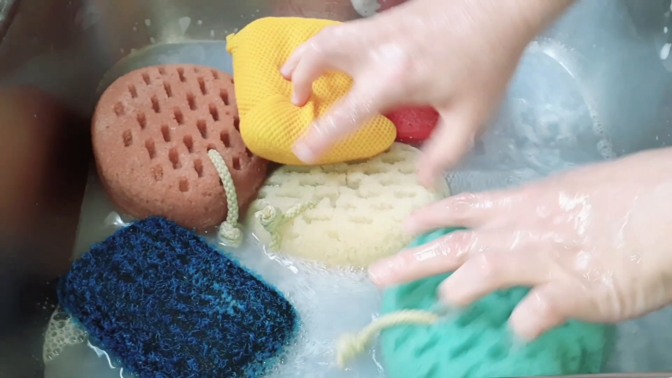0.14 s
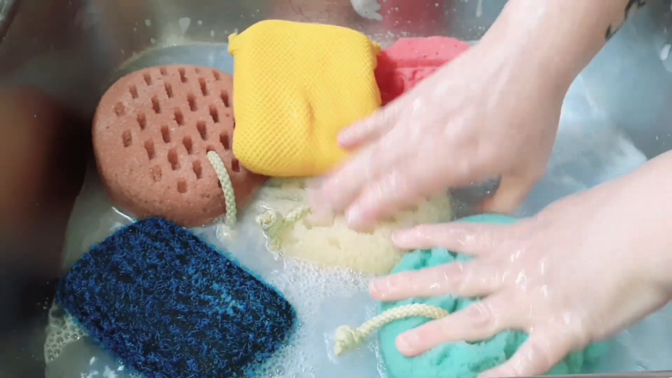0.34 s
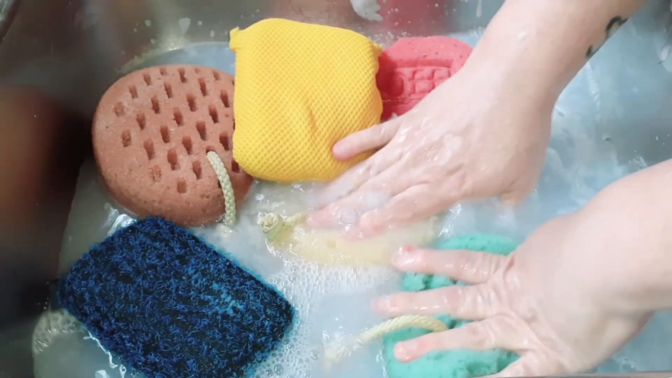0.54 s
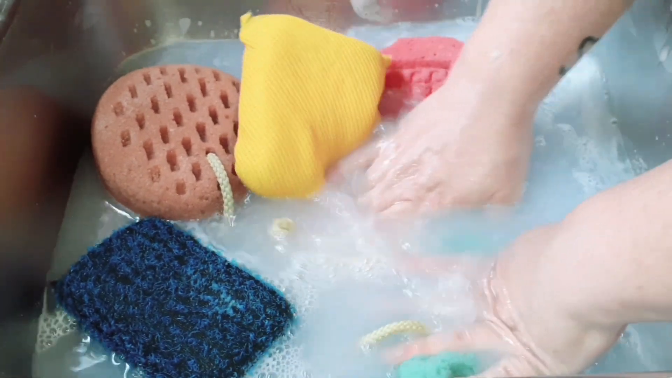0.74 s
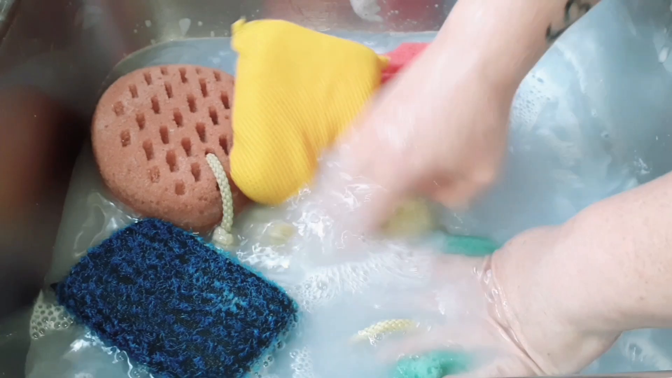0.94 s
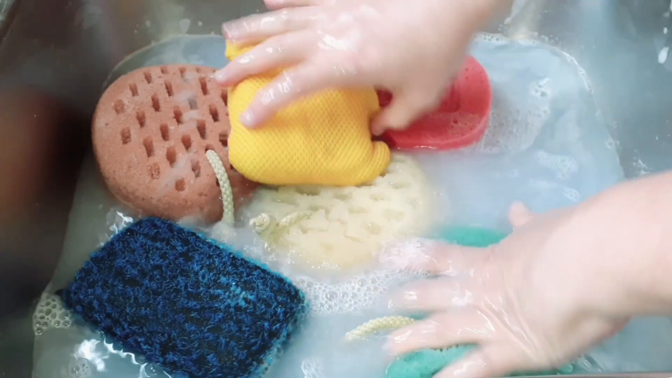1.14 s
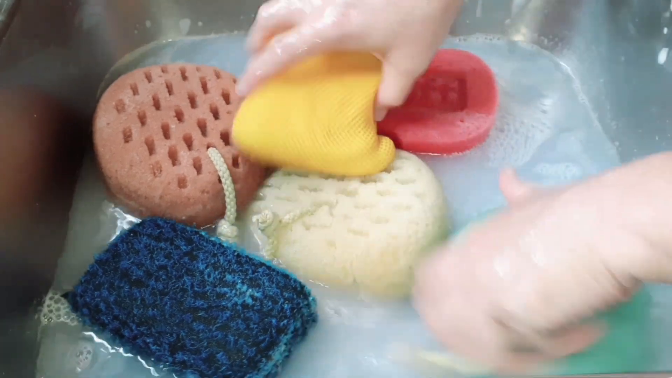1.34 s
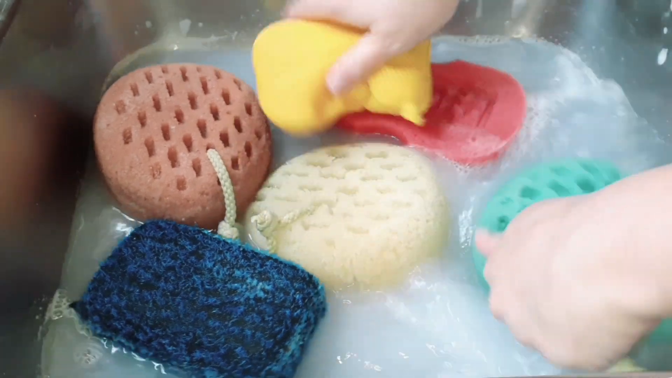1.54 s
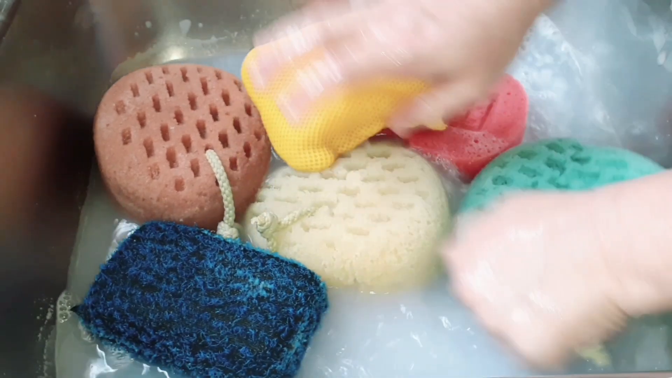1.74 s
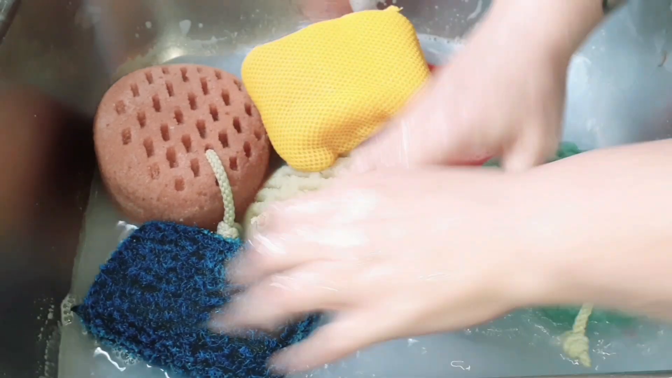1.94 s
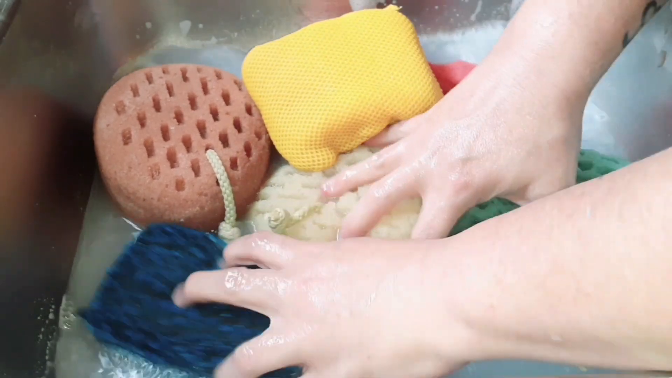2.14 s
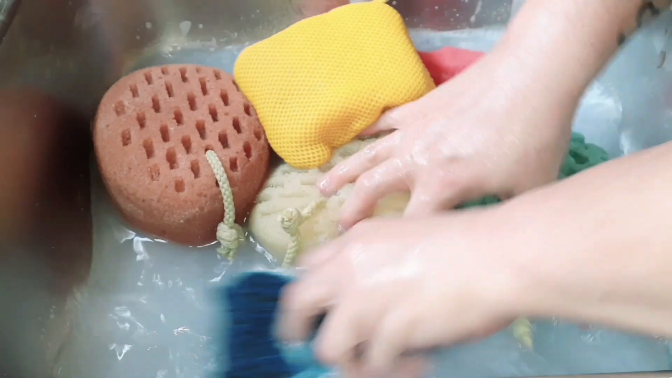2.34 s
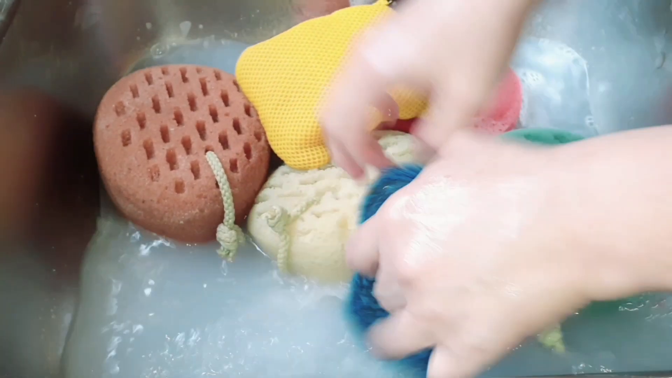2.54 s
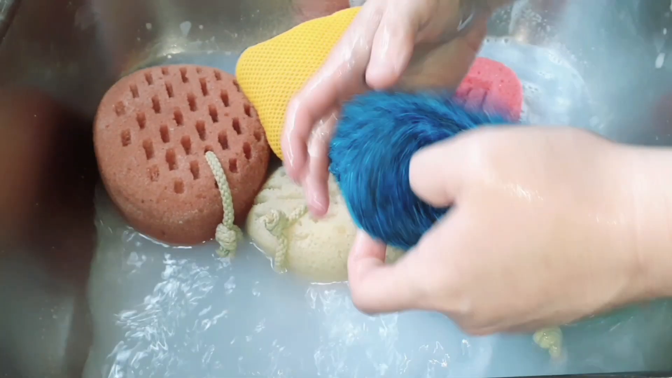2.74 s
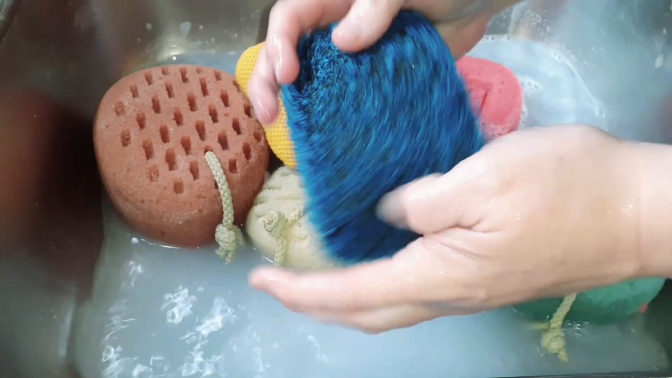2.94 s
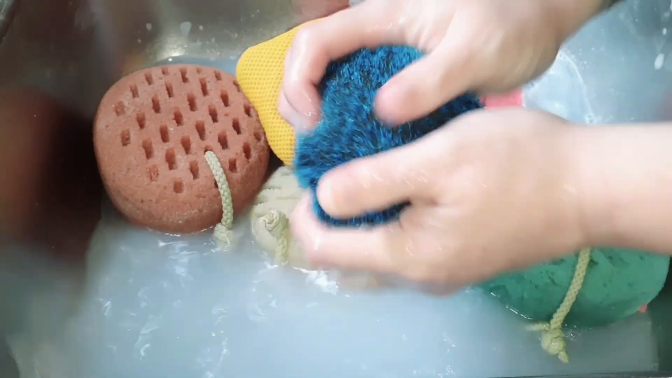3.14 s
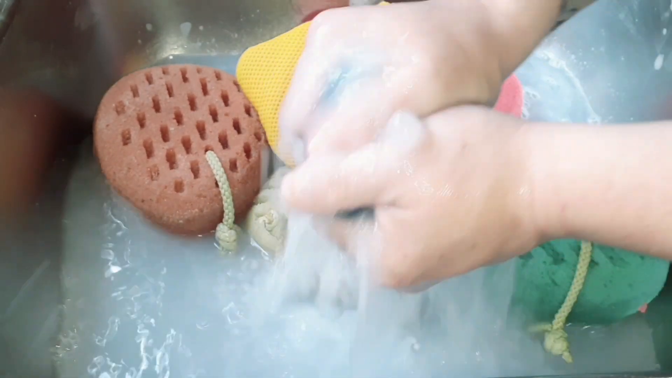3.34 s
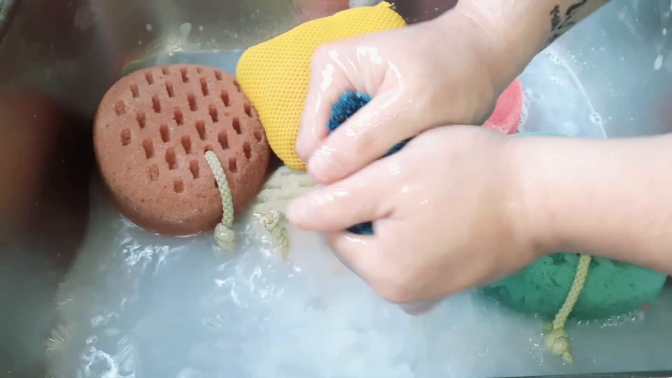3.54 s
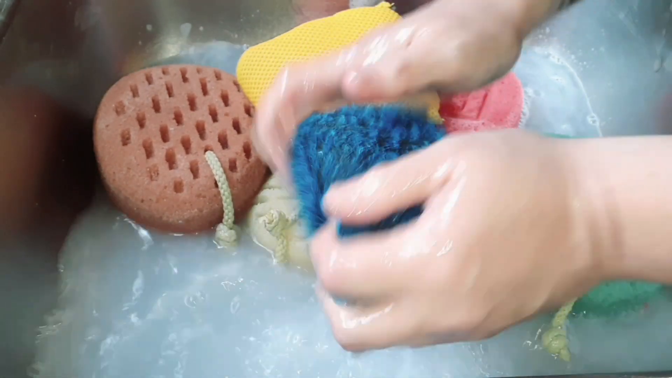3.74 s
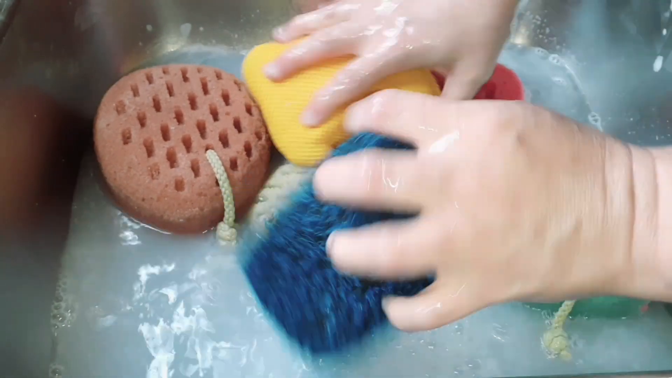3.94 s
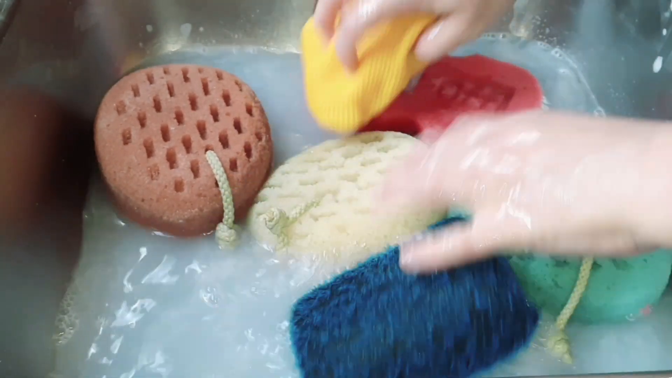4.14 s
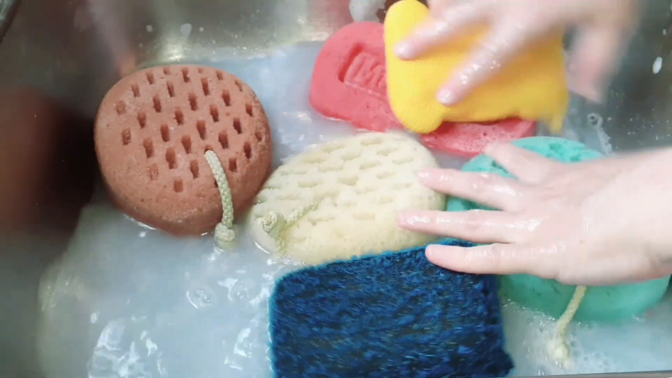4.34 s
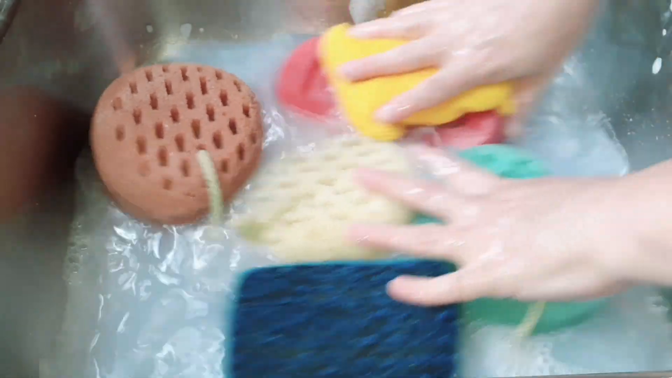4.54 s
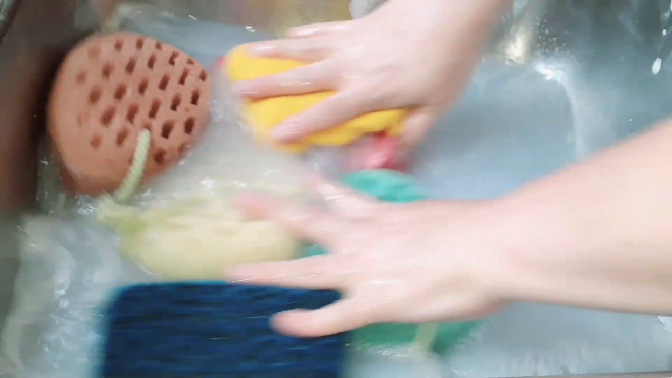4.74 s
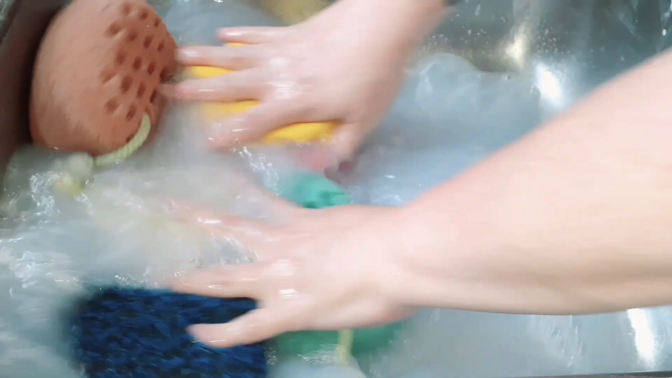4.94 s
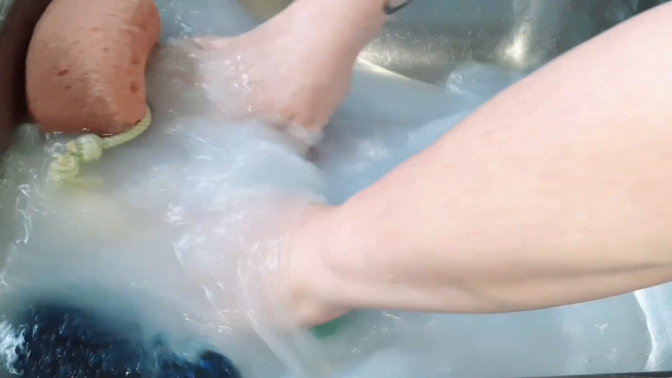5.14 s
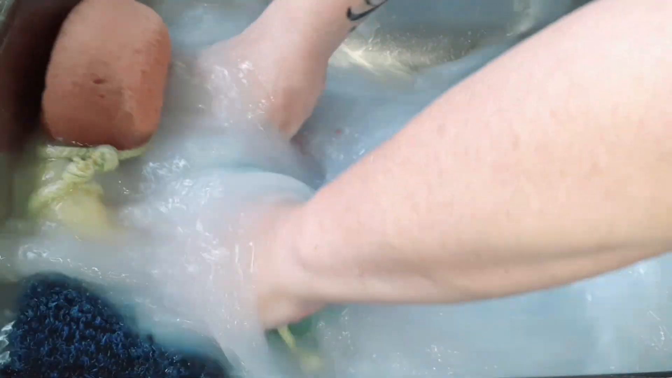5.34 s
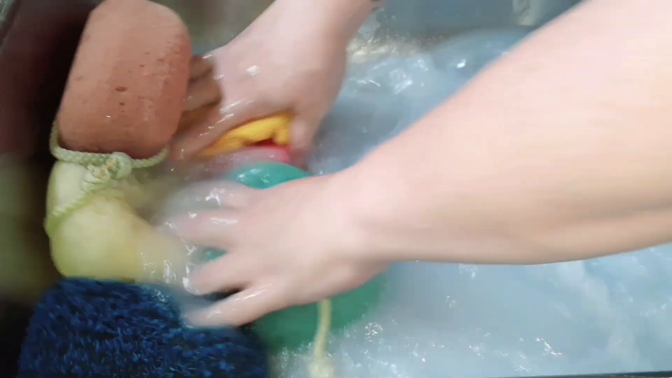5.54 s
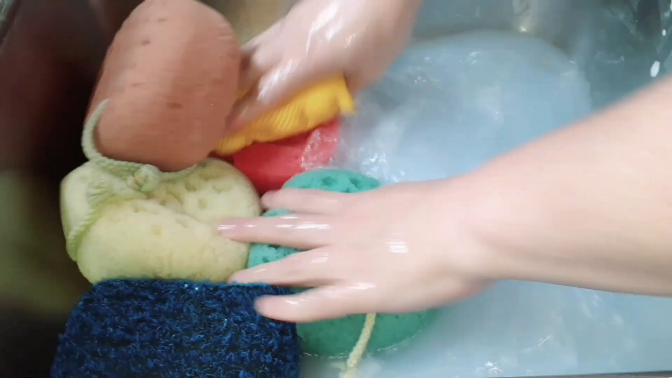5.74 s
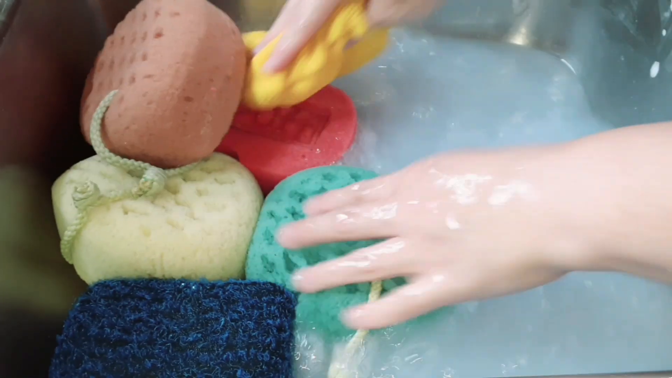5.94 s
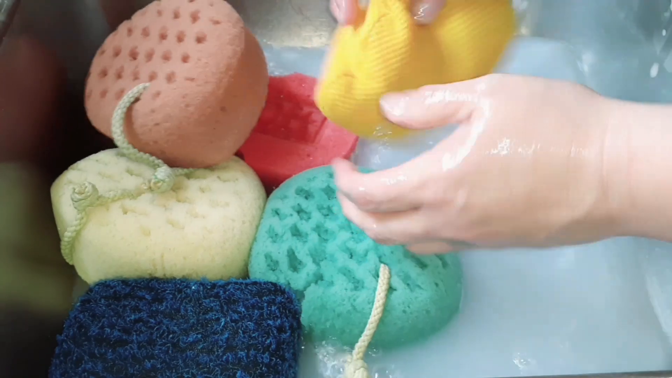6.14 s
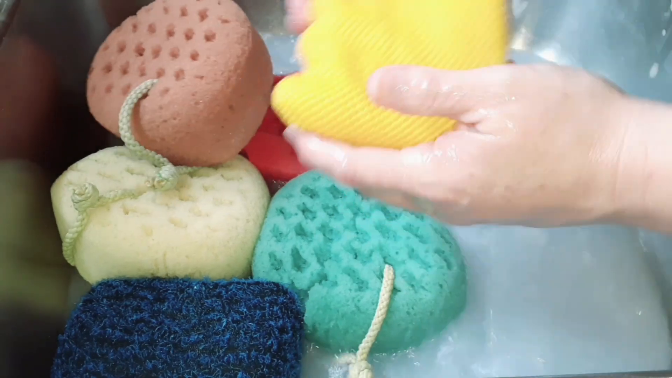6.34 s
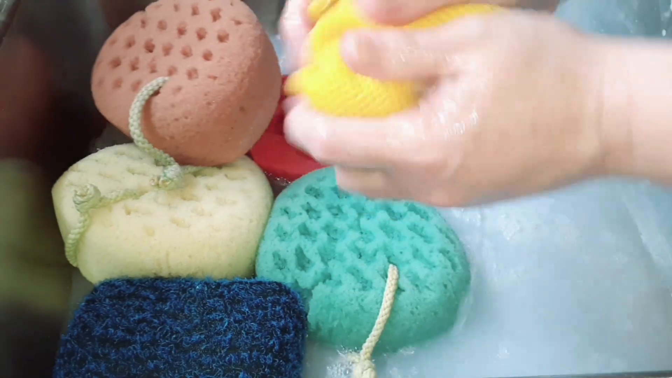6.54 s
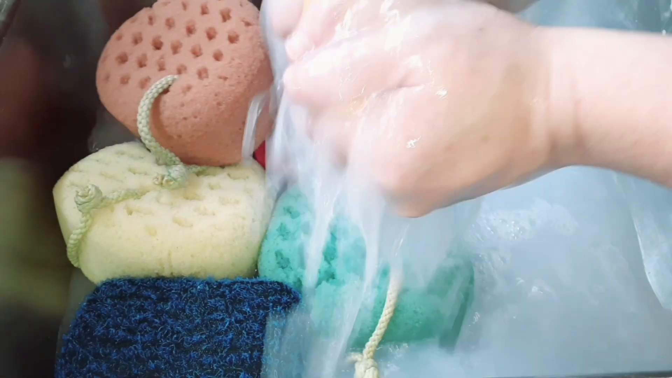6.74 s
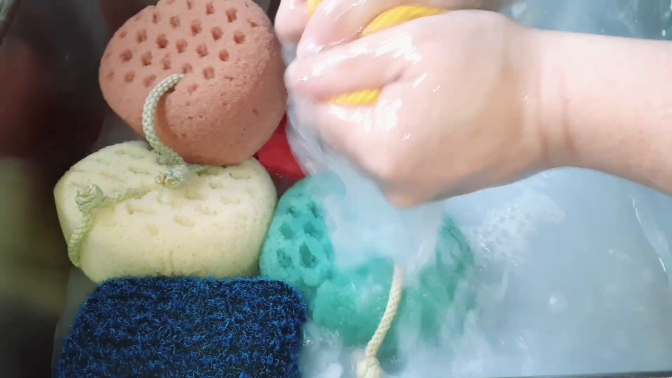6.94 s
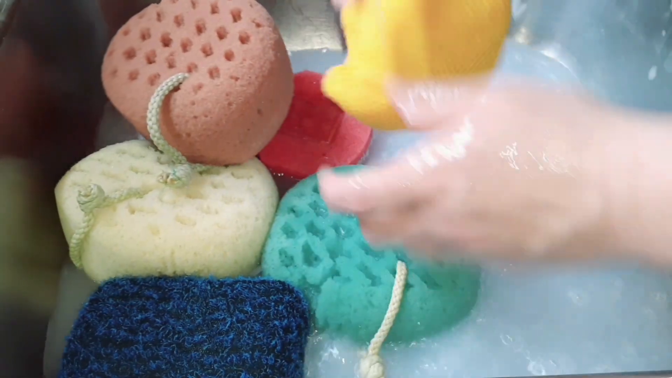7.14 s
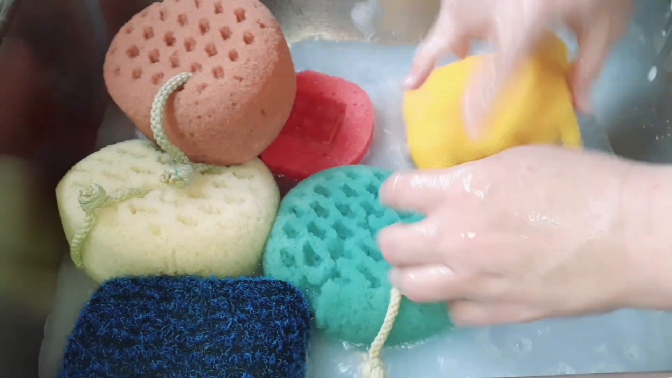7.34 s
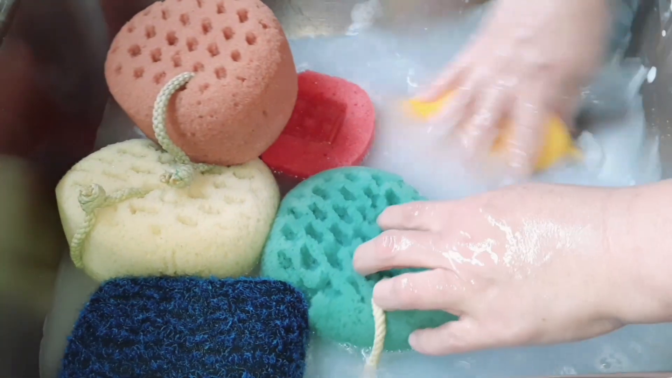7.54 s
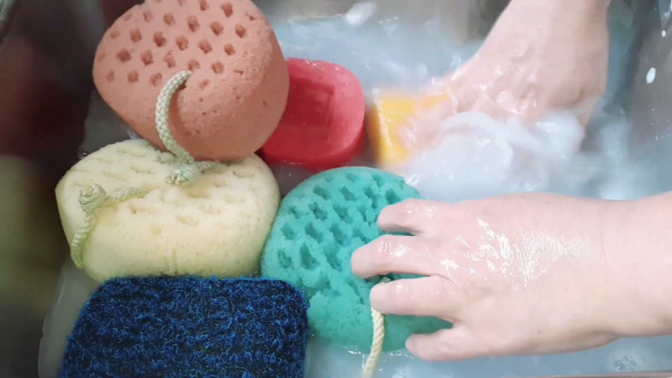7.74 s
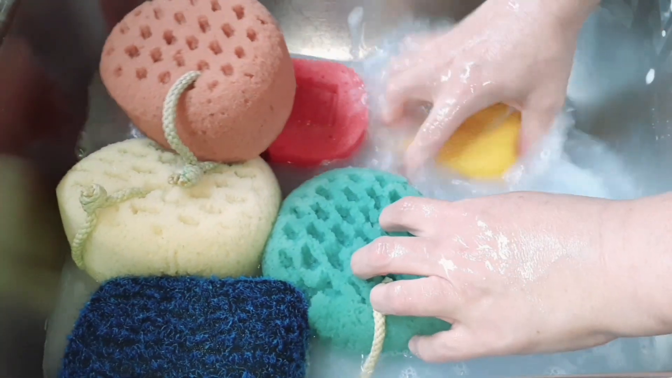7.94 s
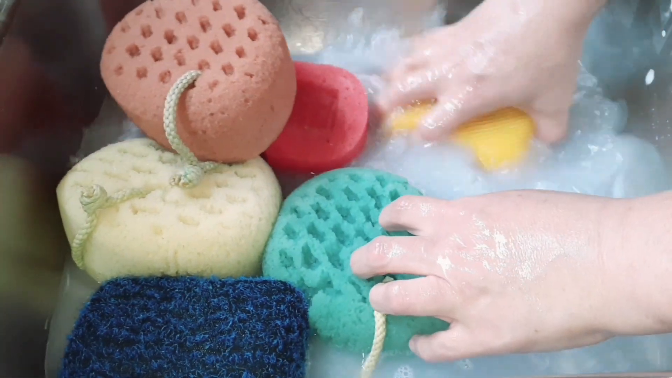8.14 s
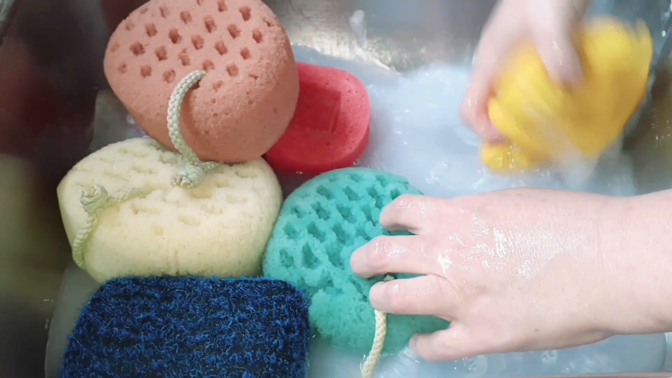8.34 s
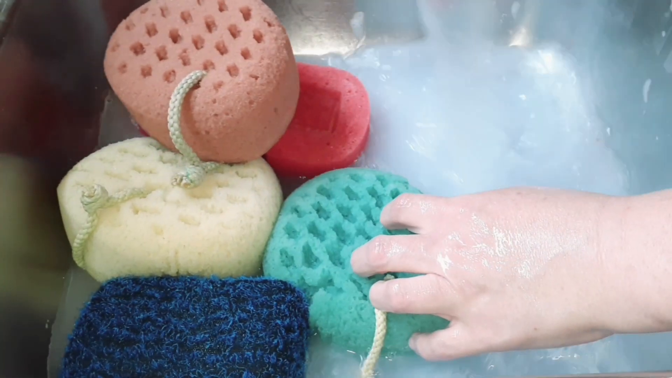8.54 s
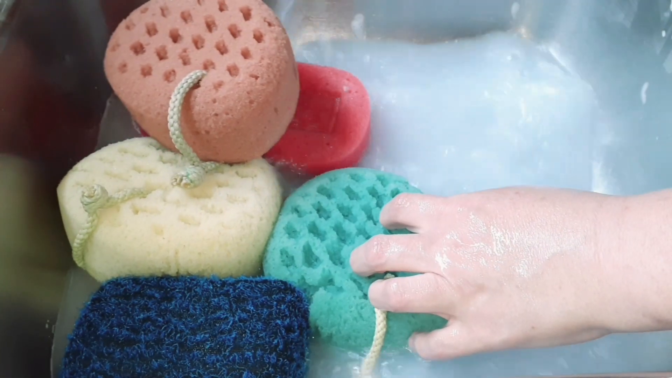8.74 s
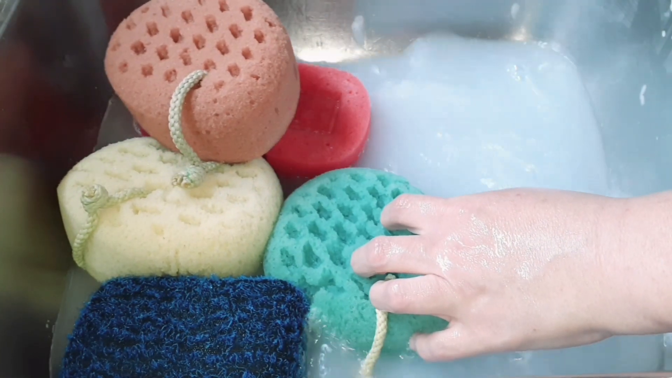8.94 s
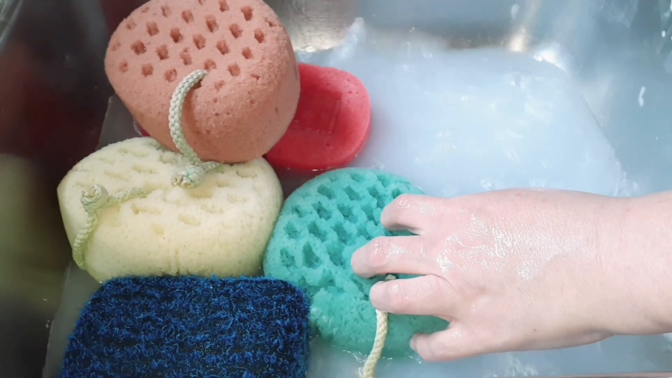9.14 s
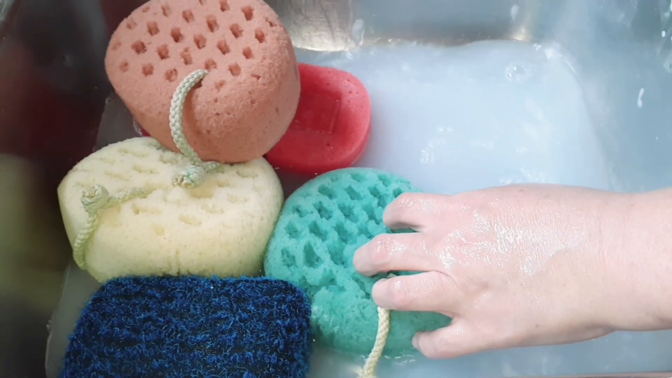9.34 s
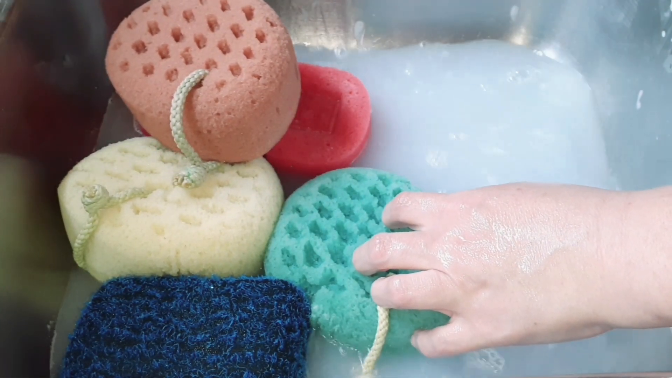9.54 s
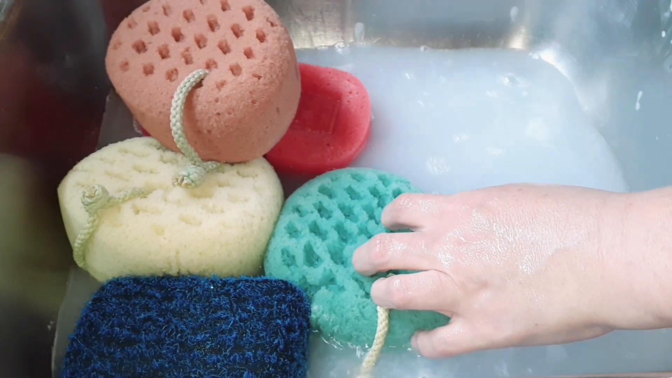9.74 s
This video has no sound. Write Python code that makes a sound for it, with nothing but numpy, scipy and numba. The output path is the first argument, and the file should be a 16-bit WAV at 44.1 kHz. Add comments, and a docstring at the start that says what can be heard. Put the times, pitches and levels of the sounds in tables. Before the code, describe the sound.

Close stereo pickup of soapy sponges squeezed by hand in shallow water in a steel sink. Soft squishes and foam fizz come first, then a dull metallic thump and a loud gush as a sponge is wrung out. Another thump, slosh and cluster of plops follow, then a second wringing with spattering drips. Busy plops and splats lead to crisp splashes and fizz at the end, over faint kitchen rumble and hum.

```python
"""Soapy sponges squeezed in a steel sink of shallow water, close to a two-port microphone.
From the start: kitchen rumble and hum (shaped noise, sines), gurgle, spray and fizz (swarms of decaying
sines) that surge with each squeeze, and patter (noise through the basin modes). From 0.5 s plops (rising
sines), from 0.9 s splats and slaps (noise bursts), from 2.6 s blows that ring the basin (decaying modes).
Plops and splats crowd the second half; sharp splats and surges of fizz close it."""
import sys
import numpy as np
from scipy import signal
from scipy.fft import rfft, irfft
from scipy.io import wavfile
from scipy.ndimage import uniform_filter1d
from numba import njit

SR = 44100
rng = np.random.default_rng(int(sys.argv[2]) if len(sys.argv) > 2 else 0)


def unload_audio(sound):
    """Save the sound as a 16-bit wav file, at the path given as the first command line argument."""
    columns = np.transpose(np.atleast_2d(sound))
    # keep every value between -1 and 1, then stretch to whole-number steps
    steps = np.round(np.clip(columns, -1, 1) * 32767)
    wavfile.write(sys.argv[1], SR, steps.astype(np.int16))


N = 436149

# kitchen noise spectrum: f/Hz, relative density/dB
KITCHEN_SPECTRUM = [(30, -10), (71, 0.5), (134, -5.5), (157, -3.5), (239, -27.5), (273, -22), (319, -23.5),
                    (740, -36), (4530, -70), (8740, -32), (16000, -35)]
# pushes, lifts and wrings that move water: start t/s, crest t/s, end t/s,
# then level/dB of gurgle, spray, foam fizz, patter on steel
SURGES = [(-0.2, 0.023, 0.15, -57, -64, -50, -51.5), (0.367, 0.513, 0.58, -74, -61.5, -59, -65),
          (0.554, 0.644, 0.81, -63, -86, -78, -60), (0.87, 0.963, 1.08, -49.5, -55, -53, -45.5),
          (1.002, 1.129, 1.274, -62, -57, -49.5, -57), (1.273, 1.398, 1.61, -55, -52, -44.5, -61.5),
          (1.417, 1.545, 1.68, -49.5, -62, -54, -54), (1.53, 1.744, 1.964, -46.5, -52.5, -46.5, -53),
          (2.096, 2.243, 2.55, -53.5, -62, -49.5, -57.5), (2.395, 2.63, 2.94, -47, -51, -43, -50.5),
          (2.962, 3.21, 3.3, -66, -58, -49.5, -65.5), (3.229, 3.28, 3.43, -34, -37, -41, -46),
          (3.272, 3.414, 3.67, -24.5, -29, -29, -33), (3.502, 3.62, 3.696, -38.5, -37.5, -37, -36),
          (3.94, 4.049, 4.22, -64, -56, -52, -74), (4.08, 4.272, 4.44, -48, -53.5, -47.5, -55),
          (4.268, 4.816, 5.48, -56, -57.5, -53.5, -57), (5.061, 5.303, 5.39, -38, -39, -39, -44.5),
          (5.29, 5.474, 5.76, -35, -40.5, -37, -42.5), (5.577, 5.8, 6.02, -46, -52, -45, -53),
          (5.93, 6.2, 6.3, -85, -87, -51, -60.5), (6.29, 6.34, 6.53, -56, -76, -50.5, -56),
          (6.484, 6.596, 7.47, -61.5, -58.5, -53, -75), (6.638, 6.922, 7.09, -42.5, -35, -33.5, -48),
          (7.073, 7.146, 7.26, -69, -58.5, -52.5, -60), (7.267, 7.526, 7.56, -54.5, -59, -53, -56.5),
          (7.54, 7.686, 7.85, -50.5, -50, -46.5, -47), (7.715, 7.958, 8.01, -39, -44.5, -42, -47),
          (8.009, 8.126, 8.18, -53, -48.5, -47, -47), (8.168, 8.18, 8.42, -44, -46, -46, -46.5),
          (8.303, 8.485, 8.68, -45, -45, -44, -56), (8.604, 8.68, 9.17, -56, -48, -41, -59),
          (8.745, 8.787, 8.9, -46, -44, -40, -49), (8.894, 9.07, 9.3, -49, -44, -32, -36.5),
          (9.034, 9.13, 9.28, -49, -32, -32, -40), (9.197, 9.358, 9.5, -51.5, -47, -43.5, -44),
          (9.415, 9.47, 9.55, -49, -32.5, -32.5, -43), (9.512, 9.623, 9.82, -51, -45, -35.5, -45),
          (9.657, 9.8, 10.05, -58, -60, -49, -46.5)]
# swell shape per layer (gurgle, spray, fizz, patter): power of a sine
SWELL_POWER = (1.67, 1.33, 1.15, 1.1)
# resting water, same layers: level/dB
REST_DB = (-102, -94, -60.5, -64.5)
# bubble swarms: rate/(1/s), middle f/Hz, spread/octaves, shortest t60/cycles (longest is triple), size scatter/dB
GURGLE = (1500, 1499, 0.656, 13.5, 3.6)
SPRAY = (3500, 3707, 0.42, 10.5, 3.3)
FIZZ = (7000, 12150, 0.3, 1.45, 3.1)
# sparse swarm of longer-ringing bubbles: same columns
GLUG = (330, 1650, 0.55, 26.6, 4.6)
# steel basin modes: f/Hz, t60/s, relative level/dB from the wall, relative level/dB from the floor
BASIN_MODES = [(124.6, 0.17, -14, -14), (155, 0.059, -15, -8.5), (229, 0.52, -15.5, -28),
               (253.6, 0.079, 6.5, -15), (261, 0.46, -14, -17.5), (279, 0.22, -4, -3),
               (308.3, 0.3, -25, -13.5), (363, 0.26, -3.5, -51), (423, 0.13, -9, -13.5),
               (513, 0.37, -6, -23.5), (580, 0.48, -25, -28), (670, 0.24, -9.5, -19.5),
               (797, 0.18, -19, -17.5), (1027, 0.22, -54, -23.5), (1370, 0.013, -49, -10)]
# air resonances in the bowl: f/Hz, width/Hz, level/dB
BOWL_MODES = [(1810, 440, -5.5), (3470, 3060, -10.5)]
# plops, mostly air pockets bursting free; a few are the thump or slap of a blow:
# t/s, level/dB ahead of the bowl, starting f/Hz
PLOPS = [(0.503, -41.5, 2030), (0.635, -43, 2150), (0.674, -42, 1740), (0.897, -32, 1670),
         (0.981, -30, 1164), (1.508, -19.5, 838), (1.573, -25, 1083), (1.624, -33, 2220),
         (1.664, -27.5, 826), (1.716, -22.5, 550), (1.726, -19, 640), (1.886, -33.5, 1310),
         (2.645, -31.5, 1740), (2.718, -29.5, 2600), (2.735, -40, 943), (2.82, -34.5, 1830),
         (3.25, -26.5, 1770), (3.28, -28, 1840), (3.346, -29, 850), (3.38, -15, 1850), (3.432, -14, 1860),
         (3.489, -11, 1684), (3.588, -10, 2480), (4.243, -22, 760), (4.712, -33, 900), (5.125, -26.5, 1775),
         (5.15, -25.5, 1046), (5.16, -29, 782), (5.194, -18, 1860), (5.21, -25, 1260), (5.222, -30, 1840),
         (5.297, -24, 1250), (5.415, -24, 1400), (5.495, -27, 1020), (5.276, -23.5, 1845),
         (5.354, -17, 1465), (5.365, -14, 1114), (5.446, -22, 1670), (5.461, -19.5, 1380),
         (5.538, -19.5, 1756), (5.635, -28.5, 990), (5.716, -31, 986), (5.769, -32.5, 867),
         (5.817, -19.5, 900), (6.324, -31, 1340), (6.871, -23, 698), (7.164, -28, 1298),
         (7.34, -34.5, 2055), (7.353, -36, 2060), (7.497, -39.5, 530), (7.425, -40, 1780),
         (7.452, -40, 1800), (7.49, -29.5, 1670), (7.57, -26, 4121), (7.629, -35.5, 1060),
         (7.683, -24.5, 456), (7.699, -23.5, 853), (7.801, -28.5, 1518), (7.84, -27, 2030),
         (7.869, -26, 1050), (7.9, -23, 1140), (7.927, -19.5, 1215), (7.942, -27, 410), (7.957, -27, 1047),
         (7.969, -25, 710), (7.984, -26.5, 860), (8.007, -22, 1005), (8.112, -25, 523),
         (8.116, -28.5, 134.5), (8.173, -8, 2960), (8.218, -12.5, 3220), (8.301, -18.5, 2282),
         (8.371, -25.5, 1360), (8.436, -23.5, 946.6), (8.465, -25.5, 938), (8.551, -25.5, 1495),
         (8.702, -23, 3920), (8.793, -23, 2845), (9.092, -17, 3820), (9.431, -13, 4020),
          (9.486, -17.5, 2660)]
# splats of drops and jets on water or steel, and slaps of blows on the basin:
# t/s, drive level/dB, body level/dB re drive
SPLATS = [(0.896, -32.5, 5), (0.996, -32, 10), (1.136, -36, 8), (1.702, -24.5, 1), (1.8833, -31.5, 4.5),
          (1.966, -34.5, -1), (2.752, -29, -7), (3.369, -21, 13), (3.396, -18, 11), (3.48, -14, -1),
          (4.241, -30, 8), (4.712, -40, 9), (4.286, -24, 0), (5.183, -27.5, 7), (5.2814, -21.5, 7),
          (5.538, -28, 10.5), (6.184, -33.5, -39), (6.2795, -29, -39), (6.708, -28, -5),
          (6.746, -21.5, -22), (6.827, -21, -17), (6.88, -13.5, -2), (6.939, -22, 8), (7.022, -18.5, -22),
          (7.0522, -24, -5), (7.3193, -29.5, -37), (7.626, -31.5, 13), (7.7703, -25.5, -25),
          (7.8353, -22, 6), (7.963, -24.5, 2), (8.024, -30, 5.5), (8.0895, -24.5, -30), (8.1716, -24, 10),
          (8.2176, -30, 12), (8.297, -26, -16), (8.4123, -29.5, -10), (8.463, -22, 2), (8.519, -31, -8),
          (8.5751, -25.5, 1), (8.775, -17, -29), (8.823, -24, -5), (8.971, -31, -27), (9.017, -18, -42),
          (9.0409, -14, -14), (9.092, -20, -20), (9.165, -15.5, -13), (9.24, -23.5, -8), (9.3913, -18, -30),
          (9.433, -12, -30), (9.566, -19.5, -43), (9.645, -28, -10), (9.755, -31, -6)]
# blows on the basin: t/s, drive level/dB, spot (0 wall, 1 floor)
KNOCKS = [(2.607, -11.5, 0), (4.238, -5, 1), (4.711, -27, 1), (7.686, -30.5, 0), (7.945, -27, 1)]

KITCHEN_DB, HUM_HZ, HUM_DB = -49.5, 59.3, -52
DRAIN_POWER = 0.96  # exponent factor after the crest
TRICKLE_S, TRICKLE_DB = 0.031, -9.5  # lagging remainder of each surge
GLUG_DB_RE_GURGLE = -7.5
SINK_OCTAVES = 0.68  # spray bubbles grow as a surge ages, so pitch sinks
FIZZ_FROM_HZ = 3800  # high-pass corner for foam and the splats' treble
BOWL_T60_S, BOWL_ECHO_DB = 0.049, -4.5
PLOP_CYCLES = 35.8  # t60 in cycles, alike at every pitch
SPLAT_T60_S = 0.056
LEFT_OVER_RIGHT_DB, MIDS_SHARE = 3, 0.19  # mid band: left cut, right raised by this share
TOP_HZ = 15900


def undb(db):
    """Level in dB to amplitude."""
    return 10 ** (np.asarray(db) / 20)


def unit(x):
    """Scale to rms 1."""
    return x / np.sqrt(np.mean(x ** 2))


def band(x, hz, width_hz):
    """Resonance with gain 1 at its centre."""
    return signal.lfilter(*signal.iirpeak(hz, hz / width_hz, SR), x)


def thin(x):
    """Keep the treble only."""
    return signal.sosfilt(signal.butter(3, FIZZ_FROM_HZ, "high", fs=SR, output="sos"), x)


def walk(rate_hz):
    """Random levels, one per 1 / rate_hz, joined by ramps; spread near 1."""
    k = int(SR / rate_hz)
    held = np.repeat(rng.standard_normal(N // k + 1), k)
    return uniform_filter1d(held, k)[:N]


@njit
def rings(start, hz, t60_s, glide, left, right, lag):
    """Decaying sines rising by the share glide over t60; the right port lags by lag samples."""
    out = np.zeros((2, N + 64))
    for k in range(len(hz)):
        n = int(t60_s[k] * SR)
        z, p = 1. + 0j, np.exp((2j * np.pi * hz[k] - np.log(1000) / t60_s[k]) / SR)
        turn = np.exp(2j * np.pi * hz[k] * glide[k] / SR / max(n, 1))
        for i in range(start[k], min(start[k] + n, N)):
            v = z.imag * min((i - start[k]) * hz[k] / SR, 1.)  # the first cycle swells
            out[0, i + 32] += left[k] * v
            out[1, i + 32 + lag[k]] += right[k] * v
            z, p = z * p, p * turn
    return out[:, 32:N + 32]


def kitchen():
    """Low rumble alike at both ports, faint hiss of resting foam, wavering mains hum with its octave."""
    f_hz = np.fft.rfftfreq(N, 1 / SR) + 1
    hz, db = np.transpose(KITCHEN_SPECTRUM)
    shape = undb(np.interp(np.log(f_hz), np.log(hz), db))
    mid, side = rfft(rng.standard_normal((2, N))) * shape
    side = side * np.clip(f_hz / 1200, .1, .7)
    air = unit(irfft(np.array([mid + side, mid - side]), N))
    air = air * undb(KITCHEN_DB + 0.3 * walk(3.13))
    phase = 2 * np.pi * np.cumsum(HUM_HZ + 0.77 * walk(4.3)) / SR
    hum = np.sin(phase) + undb(-11.5) * np.sin(2 * phase)
    return air + hum * undb(HUM_DB + 1.05 * walk(1.8))


def surges():
    """Layer levels in dB as surges swell, drain and add in power; age of the spray (0 new, 1 spent)."""
    t = np.arange(N) / SR
    power = undb(REST_DB)[:, None] ** 2 + 0 * t
    aged = power[1] / 2  # spray power times age
    for start, crest, end, *db in SURGES:
        on = (t > start) & (t < end)
        swell = np.sin(np.interp(t[on], (start, crest, end), (0, np.pi / 2, np.pi))).clip(0)
        exponent = np.array(SWELL_POWER)[:, None] * np.where(t[on] > crest, DRAIN_POWER, 1)
        added = (undb(db)[:, None] * swell ** exponent) ** 2
        power[:, on] += added
        aged[on] += added[1] * (t[on] - start) / (end - start)
    age = aged / power[1]
    keep = np.exp(-1 / (TRICKLE_S * SR))
    trickle = signal.lfilter([1 - keep], [1, -keep], power)
    return 10 * np.log10(power + undb(TRICKLE_DB) ** 2 * trickle), age


def swarm(kind, glide, wide_db, lag, clump_db, bend):
    """Ringing bubbles of scattered size and place, clumped by a random level; bend in octaves."""
    rate, hz, octaves, cycles, scatter_db = kind
    when, chance, length = rng.random((int(rate * N / SR), 3)).T
    spread, place = np.clip(rng.standard_normal((len(when), 2)).T, -2, 2)
    start = (when * N).astype(np.int64)
    pitch_hz = np.clip(hz * 2 ** (octaves * spread + bend[start]), 100, .4 * SR)
    t60_s = cycles * (.5 + length) * 2 / pitch_hz
    size = undb(scatter_db * np.minimum(-np.log(chance), 4))
    lags = np.clip(lag * place, -30, 30).astype(np.int64)
    x = rings(start, pitch_hz, t60_s, glide + 0 * pitch_hz,
              size * undb(wide_db * place), size * undb(-wide_db * place), lags)
    return unit(x * undb(clump_db * walk(40)))


def bubbles(gurgle_db, spray_db, age, clumps):
    """Pressed-out water: gurgle, sparse ringing glugs and spray, each a swarm under its surge level."""
    gurgle = swarm(GURGLE, glide=0.27, wide_db=7.0, lag=12.9, clump_db=3.0, bend=0.2 * walk(14))
    glug = swarm(GLUG, glide=0.37, wide_db=7.0, lag=7.8, clump_db=4.0, bend=0 * age)
    spray = swarm(SPRAY, glide=0.42, wide_db=3.5, lag=6, clump_db=3.0, bend=SINK_OCTAVES * (.5 - age))
    out = undb(gurgle_db + 0.78 * clumps) * gurgle
    out += undb(gurgle_db + GLUG_DB_RE_GURGLE) * glug
    return out + undb(spray_db + 2.7 * clumps) * spray


def foam(fizz_db, clumps):
    """Foam fizz: a dense swarm of very short, high rings."""
    fizz = swarm(FIZZ, glide=0, wide_db=4.5, lag=0, clump_db=3.0, bend=np.zeros(N))
    return undb(fizz_db + 2.14 * clumps) * thin(fizz)


def flicker(x):
    """The finest treble flickers in level on its own."""
    return x + (undb(2.7 * walk(25) - 2.0) - 1) * band(x, 14600, 4500)


def patter(patter_db):
    """Falling water as noise that drives the steel modes; broader bands as the whole sink shudders."""
    mid, side = rng.standard_normal((2, N)) * undb(1.8 * walk(30))
    rain = np.array([mid + .25 * side, mid - .25 * side])
    hz, t60_s, *spot_db = np.transpose(BASIN_MODES)
    loudest_db = np.max(spot_db, axis=0)
    drum = unit(sum(undb(1.03 * db) * band(rain, f, 12 + 4 / t) for f, t, db in zip(hz, t60_s, loudest_db)))
    for gain, f, width_hz in ((1.78, 137, 57), (1.3, 222, 35), (0.13, 670, 40), (0.22, 1070, 55)):
        drum = drum + gain * unit(band(rain, f, width_hz))
    return unit(drum) * undb(patter_db)


def bowl(x):
    """Air in the bowl favours a few bands; dense wall echoes differ at each port."""
    x = 0.83 * x + sum(undb(db) * band(x, hz, width_hz) for hz, width_hz, db in BOWL_MODES)
    t = np.arange(int(.2 * SR)) / SR
    echo = rng.standard_normal((2, len(t))) * 1000 ** (-t / BOWL_T60_S) * (t > .001)
    echo /= np.sqrt(np.sum(echo ** 2, axis=1, keepdims=True))
    mono = x.mean(axis=0, keepdims=True)
    return x + undb(BOWL_ECHO_DB) * signal.fftconvolve(mono, echo, axes=1)[:, :N]


def plops():
    """Each plop rings and slides up; fainter rings follow at other pitches; a faint steady ring lingers."""
    s, db, hz = np.transpose(PLOPS)
    pan, late, up, later, off = np.clip(rng.standard_normal((len(s), 5)).T, -2, 2)
    # wait/s, pitch shift/share, level/dB, t60/cycles, glide/share
    parts = ((0, 0, 0, PLOP_CYCLES, 0.14),
             (0.013 + 0.0052 * late, 0.08 + 0.088 * up, -13, 40, 0.16),
             (0.004 + 0.012 * abs(later), 0.2 * off, -11, 25, 0.16),
             (0.006, 0.1, -18, 160, 0))
    out = 0
    for wait_s, shift, part_db, cycles, glide in parts:
        start = ((s + wait_s) * SR).astype(np.int64)
        left, right = undb(db + part_db + 1.1 * pan), undb(db + part_db - 1.5 * pan)
        out = out + rings(start, hz * (1 + shift), cycles / hz, glide + 0 * s,
                          left, right, (4 * pan).astype(np.int64))
    return out


def splats():
    """Noise bursts: sharp tick, millisecond spread, short wet tail; each with its own share of body."""
    top, body = np.zeros((2, N + SR)), np.zeros((2, N + SR))
    t = np.arange(SR // 4) / SR
    tail = (1 - np.exp(-t / 0.0011)) * 1000 ** (-t / SPLAT_T60_S)
    shape = tail + 1.15 * np.exp(-t / 0.00055)
    for s, db, body_db in SPLATS:
        rough_db = 2.9 * rng.standard_normal(len(t) // 64 + 1).repeat(64)[:len(t)]
        mid, side = rng.standard_normal((2, len(t))) * shape * undb(db + rough_db)
        i = int(s * SR)
        top[:, i:i + len(t)] += np.array([mid + .5 * side, mid - .5 * side])
        body[:, i:i + len(t)] += np.array([mid + side, mid - side]) * undb(body_db)
    top = thin(band(top[:, :N], 10200, 10500))
    body = band(band(body[:, :N], 2900, 4300), 2900, 4300)
    return 0.66 * top + 0.5 * body


def knocks():
    """Soft blows ring the steel modes, weighted by the spot struck."""
    hz, t60_s, *spot_db = np.transpose(BASIN_MODES)
    tilt_db = 1.2 * np.log2(hz / 250)  # higher modes lean right
    lag = (12 * (-1) ** np.arange(len(hz))).astype(np.int64)  # neighbours reach the ports in turn
    out = 0
    for s, db, spot in KNOCKS:
        g = undb(db + spot_db[int(round(spot))])
        out = out + rings(np.full(len(hz), int(s * SR)), hz, t60_s, 0 * hz,
                          -g * undb(-5.0 - tilt_db), -g * undb(tilt_db - 7.0), lag)
    soft = np.hanning(20)  # flesh makes the push last half a millisecond
    out = signal.lfilter(soft / soft.sum(), 1, out)
    return out * undb(2.0 * walk(120))  # slopping water roughens the ring


def scene():
    """Water, plops and splats sound in the bowl; the steel rings; the kitchen hums."""
    room = kitchen()
    (gurgle_db, spray_db, fizz_db, patter_db), age = surges()
    clumps = walk(70)  # shared random unevenness of gurgle, spray and fizz
    water = bubbles(gurgle_db, spray_db, age, clumps)
    treble = flicker(foam(fizz_db, clumps) + splats())
    steel = patter(patter_db) + knocks()
    return bowl(water + treble + plops()) + steel + room


def record(dry):
    """Ports of unequal gain, no deep bass, a steep cut at the top."""
    x = dry * undb(np.array([[LEFT_OVER_RIGHT_DB], [-LEFT_OVER_RIGHT_DB]]) / 2)
    x = x + MIDS_SHARE * np.array([[-1], [1]]) * band(x, 1940, 5800)
    x = signal.sosfilt(signal.butter(4, 46, "high", fs=SR, output="sos"), x)
    return signal.sosfilt(signal.ellip(10, .2, 85, TOP_HZ, fs=SR, output="sos"), x)


dry = scene()
out = record(dry)
unload_audio(out)
```